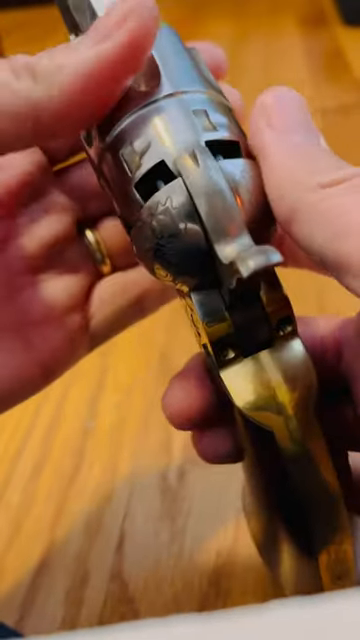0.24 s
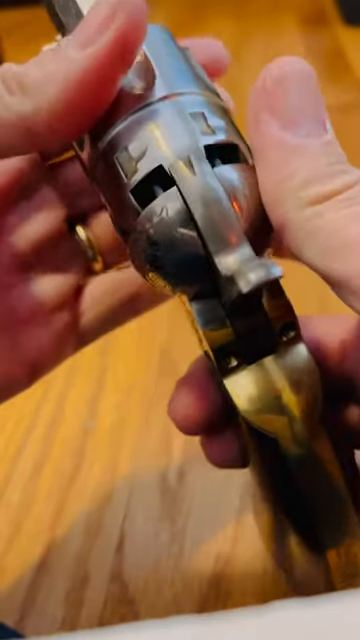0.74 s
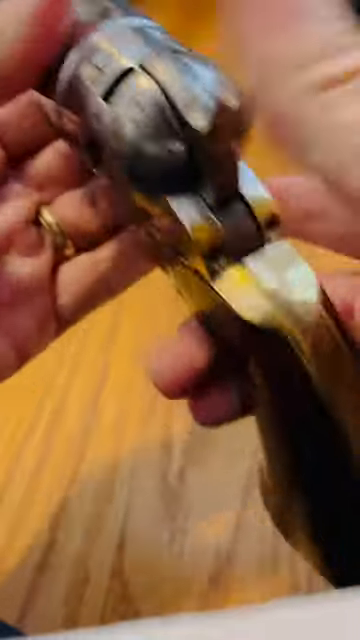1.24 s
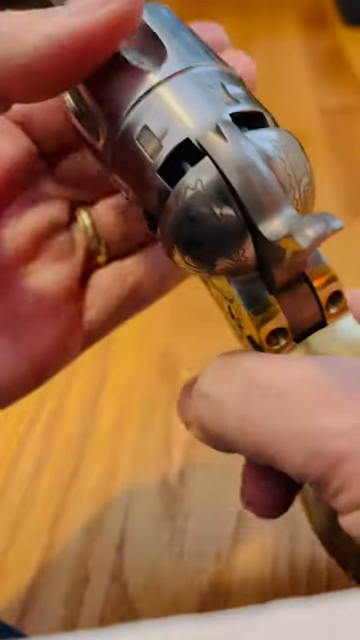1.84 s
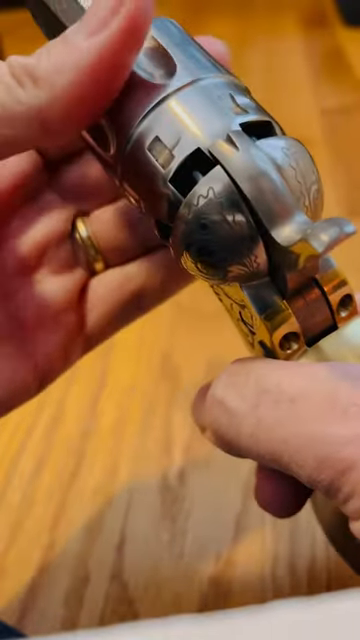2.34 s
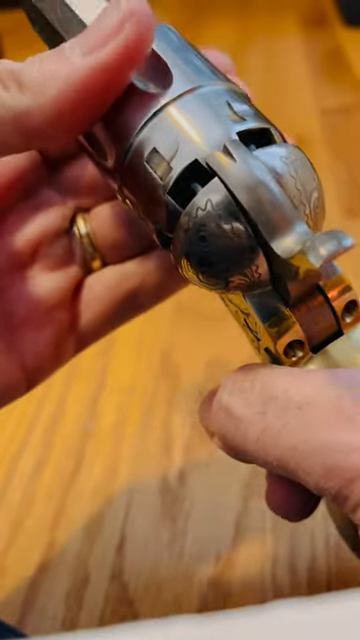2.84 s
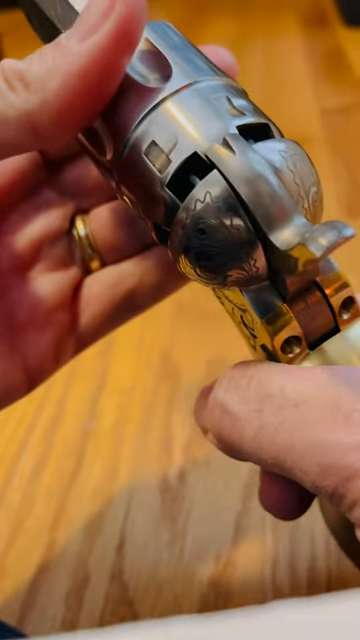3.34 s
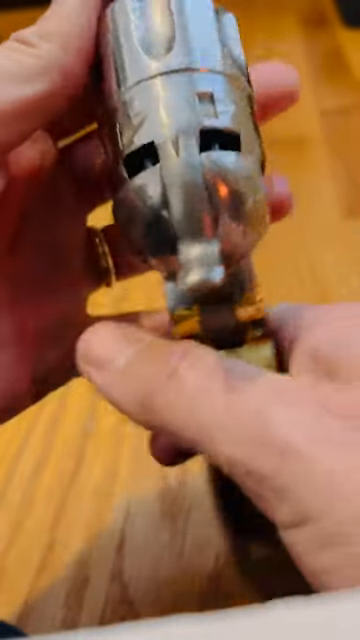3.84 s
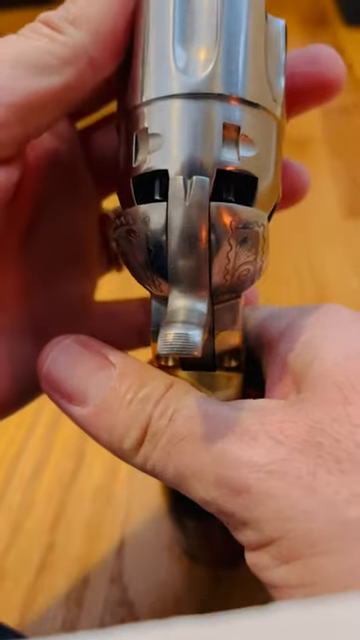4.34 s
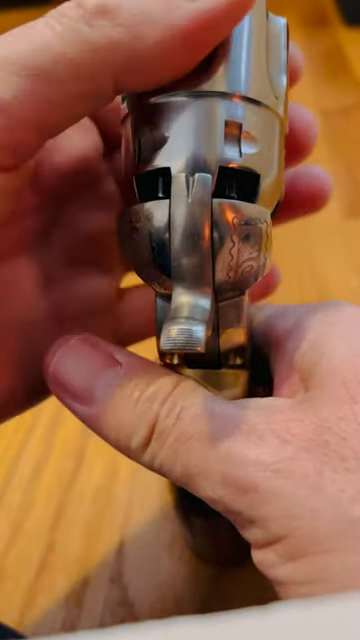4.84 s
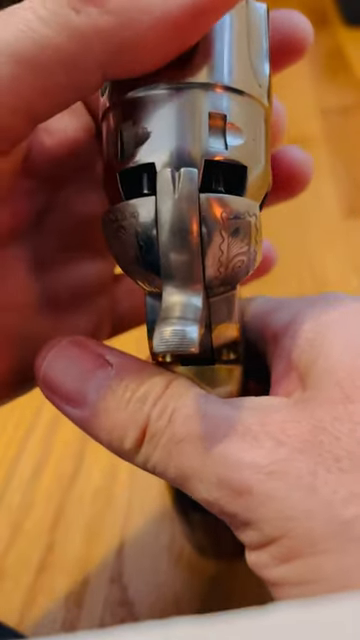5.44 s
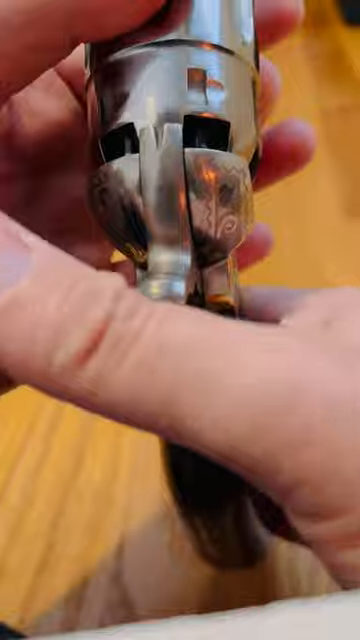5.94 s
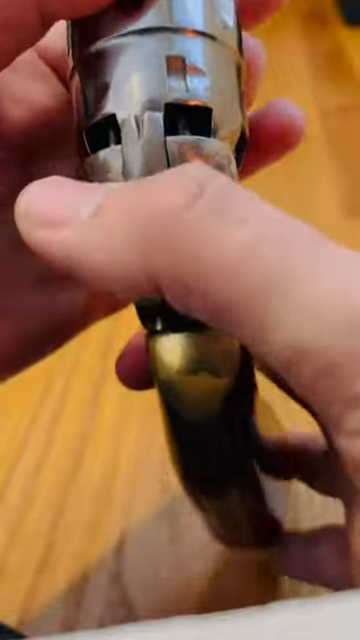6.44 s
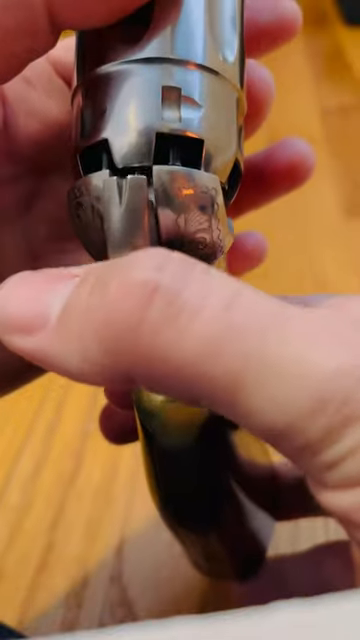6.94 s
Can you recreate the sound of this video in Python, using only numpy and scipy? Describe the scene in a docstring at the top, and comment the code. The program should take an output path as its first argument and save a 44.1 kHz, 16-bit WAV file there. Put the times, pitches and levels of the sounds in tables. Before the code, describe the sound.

Hands work a revolver close to the microphone in a quiet room, over a faint, low, throbbing hum. Two light metallic knocks come at about 0.5 and 0.7 seconds, followed by small ticks and soft, dull handling bumps until 1.5 seconds. From 1.8 to 2.2 seconds the mechanism gives a quick cluster of crisp clicks, with another light knock near 2.5. More clicks start around 3.4 seconds and end in the sharpest snap at 3.5, which leaves a brief, high steel ring. At about 3.9 seconds a heavy thud, the loudest sound, resonates through a wooden table and dies quickly. After that the handling is quieter, with scattered ticks and knocks near 4.5, 5.3 and 5.7 seconds, a soft bump at 6.5 and a last click at 6.9. Skin faintly rubs and slides on steel between the clicks.

```python
"""Revolver handled over a table

Hands turn a revolver's cylinder and work its hammer in a quiet room, close to a pair of microphones.
Loose parts knock and excite the frame's damped modes; the latch snaps and sets spring and cylinder ringing.
Skin hisses on steel by friction, the wooden table resonates under one heavy thud, and a low hum throbs."""
import sys
import numpy as np
from scipy import signal
from scipy.fft import rfft, irfft
from scipy.io import wavfile
from scipy.ndimage import uniform_filter1d

SR = 44100
rng = np.random.default_rng(int(sys.argv[2]) if len(sys.argv) > 2 else 0)


def unload_wav(signal):
    """Save mono or channel-first audio to the path in sys.argv[1] as 16-bit WAV at rate SR, clipped to [-1, 1]."""
    wavfile.write(
        sys.argv[1],
        SR,
        np.round(np.clip(np.atleast_2d(signal).T, -1, 1) * 32767).astype(np.int16),
    )


N = 317520
CRACK_SAMPLES, RING_SAMPLES = 1024, 3000


def amp(db):
    """Amplitude ratio of a level: tenfold for every 20 dB."""
    return 10 ** (np.asarray(db) / 20)


def unit_rms(x):
    """Normalisation to a mean power of 1."""
    return x / np.sqrt(np.mean(x ** 2) + 1e-20)


def at_hz(points, hz):
    """Interpolation of a curve along a logarithmic frequency axis."""
    f, value = np.transpose(points)
    return np.interp(np.log(hz + 1), np.log(f + 1), value)


def over_time(rows):
    """Linear interpolation of each column against time, one value a sample."""
    times, *columns = np.transpose(rows)
    return [np.interp(np.arange(N) / SR, times, c) for c in columns]


def add(mix, start, sound):
    """Superposition: a sound joins the mix at its start time in seconds."""
    part = mix[round(start * SR):][:len(sound)]
    part += sound[:len(part)]


def filtered(x, spectrum):
    """Zero-phase filtering: each frequency is weighted by the spectrum's level."""
    return irfft(rfft(x) * amp(at_hz(spectrum, np.fft.rfftfreq(len(x), 1 / SR))), len(x))


def noise(spectrum, size):
    """Coloured noise of rms 1, filtered from white noise."""
    return unit_rms(filtered(rng.standard_normal(size), spectrum))


def wander(size):
    """Slow random fluctuation of rms 1: a moving average of noise over size samples."""
    return unit_rms(uniform_filter1d(rng.standard_normal(N), size))


def wavering(hz, db, spread):
    """Frequency modulation: a tone's pitch wanders slowly about its curve."""
    pitch = hz * (1 + spread * wander(size=2500))
    return np.sqrt(2) * amp(db) * np.sin(2 * np.pi * np.cumsum(pitch) / SR)


def ring(hz, t60, rise, size=RING_SAMPLES):
    """A damped mode builds up, then decays by 60 dB every t60 seconds."""
    t = np.arange(size) / SR
    return amp(-60 * t / t60) * (1 - np.exp(-t / rise)) ** 2 * np.sin(2 * np.pi * hz * t)


def burst(spectrum, t60, rise):
    """A brief impact is broadband: noise with a fast attack and an exponential decay."""
    t = np.arange(CRACK_SAMPLES) / SR
    return noise(spectrum, CRACK_SAMPLES) * amp(-60 * t / t60) * (1 - np.exp(-t / rise))


def dying(decays, size):
    """Frequency-dependent damping: noise of energy 1 whose bands decay at their own rates."""
    hz, t, bands = signal.stft(rng.standard_normal(size), SR, nperseg=256)
    envelopes = amp(-60 * t / at_hz(decays, hz)[:, None])
    tail = signal.istft(bands * envelopes, SR, nperseg=256)[1]
    return tail / np.linalg.norm(tail)


def hum():
    """Amplitude modulation: a low tone throbs about once a second under two faint, wavering ones."""
    # throb of the low tone: (time [s], level [dB])
    throb = [(0, -59.5), (.3, -59), (.42, -79), (.6, -82), (.72, -65), (1.3, -58.5), (1.72, -71.5),
             (1.9, -62), (2.28, -56.5), (2.5, -76), (2.98, -56), (3.2, -70), (3.68, -58), (4.15, -58),
             (4.42, -72.5), (4.62, -61), (5.25, -60), (5.43, -74.5), (5.56, -61.5), (6.15, -58.5),
             (6.28, -69.5), (6.46, -61.5), (7.2, -64)]
    # the two tones above it: (time [s], frequency [Hz], level [dB])
    drone = [(0, 120, -86.5), (2.2, 127, -79.5), (2.9, 119.5, -79), (3.8, 126.7, -74), (5.3, 138.8, -72.5),
             (5.5, 135.8, -88.5), (6.75, 129.1, -88), (6.95, 124.6, -70.5), (7.2, 115, -68)]
    whir = [(0, 278, -72), (.35, 272, -85), (1.8, 266, -80), (2.1, 260, -74), (2.4, 264, -90.5),
            (3.7, 270, -77.5), (4.5, 268, -89), (4.75, 267, -74.5), (5.85, 281, -74.5), (6.05, 281, -85.5),
            (6.7, 264, -86.5), (6.83, 262, -77), (7.2, 272, -78.5)]
    hum_hz, flutter_db = 59.4, 3.5
    hum_db = over_time(throb)[0] + flutter_db * wander(size=3000)
    low = wavering(hum_hz, hum_db, spread=0.006)
    return low + wavering(*over_time(drone), spread=0.028) + wavering(*over_time(whir), spread=0.01)


def room_air():
    """Ambient noise: a steady floor with most of its power at low frequencies."""
    # spectrum of the quiet room: (frequency [Hz], relative density [dB])
    air = [(15, -54), (32, -26.5), (60, -7), (120, -8.5), (196, -19), (278, -13.5), (400, -31),
           (700, -28.5), (1200, -36.5), (2500, -38.5), (4800, -42), (9000, -51), (13000, -52.5),
           (14000, -62), (16000, -64.5)]
    return amp(-70) * noise(air, N)


def grip_rustle():
    """Friction of a shifting grip makes low noise of uneven level."""
    # strength of the rustle: (time [s], level [dB])
    rustle = [(0, -74), (.3, -83), (.9, -91), (1.2, -81.5), (2.2, -79.5), (2.6, -86.5), (3.2, -88.5),
              (3.55, -71), (3.9, -78), (4.3, -91), (5, -99), (5.8, -88), (6.1, -75), (6.5, -74.5),
              (6.7, -88), (7, -84), (7.2, -73.5)]
    grip = noise([(120, -32), (300, 0), (600, -4), (1000, -14.5), (2000, -38)], N)
    return amp(over_time(rustle)[0] + 0.72 * wander(size=900)) * grip


def knocks():
    """Impact excitation: loose parts ring the hand-damped frame, detuned by the grip, under a dry tick."""
    # blows: (time [s], level [dB], low-mode gain [dB], upper-mode gain [dB], sharpness [dB])
    blows = [(0.5344, -42, -21.5, -9.5, -24), (0.6853, -44.5, -16.5, -30, -5.5), (1.049, -55, -4, -4, 2.5),
             (1.291, -66, -6, 8.5, 8), (1.3799, -62, -12.5, -3, 2), (1.5728, -67, -5.5, -14, 0),
             (1.6475, -58.5, -13.5, -13, -6), (1.8341, -37, -25.5, -15, -15.5),
             (2.0321, -55, -22, -12, -11), (2.2179, -45.5, -22, -18, -9.5),
             (2.4566, -44.5, -17.5, -19, -22.5), (2.5722, -58.5, -12, -17, -7.5),
             (2.8971, -69, 1.5, -5, -5), (3.1674, -70.5, -1.5, -25, -19), (3.1976, -72.5, -4, -18, -21),
             (3.2352, -63.5, -30, -9, -13.5), (3.374, -59, -3.5, 1.5, 11.5),
             (3.5487, -43, -41.5, 0.5, -0.5), (3.7127, -60, -15, -1.5, -8),
             (4.4637, -56.5, -32.5, -9.5, -34.5), (4.4852, -60, -30, -10, -28), (4.6095, -73, -6, -7, 3.5),
             (5.3023, -47.5, -14.5, -10, -17), (5.6296, -65.5, -11, -13.5, -18),
             (5.6616, -54, -41, -8, -12), (5.925, -60, -6.5, 5, -2.5), (6.4676, -62, -6.5, -33.5, -17),
             (6.6189, -70.5, -7.5, -11, -7.5), (6.9381, -46, -9.5, -11.5, -24)]
    # modes of the held frame: (frequency [Hz], level [dB], t60 [s])
    frame_modes = [(921.7, 10.5, 0.045), (1550, 9.5, 0.015), (1974, 5, 0.014), (2844, 12.5, 0.013),
                   (4048, 9, 0.0088), (5127, 9, .008), (7600, -11, 0.0053)]
    # gain that each mode takes: (index: 0 none, 1 low-mode, 2 upper-mode, 3 sharpness)
    gain_of_mode = [1, 1, 0, 2, 3, 3, 3]
    out = np.zeros(N)
    detunings = 1 + 0.06 * rng.standard_normal((len(blows), len(frame_modes)))
    for (start, db, low_db, upper_db, sharp_db), ratios in zip(blows, detunings):
        gains = amp(db + np.array([0, low_db, upper_db, sharp_db]))[gain_of_mode]
        for (hz, mode_db, t60), gain, ratio in zip(frame_modes, gains, ratios):
            add(out, start - 0.0007, gain * amp(mode_db) * ring(hz * ratio, t60, rise=0.00033))
        # a sharper blow has more treble
        tick = [(400, -16), (1000, -2), (1700, 3.5), (3000, -7), (6000, sharp_db), (14000, sharp_db - 19.5)]
        add(out, start - 0.0005, amp(db - 16) * burst(tick, t60=0.072, rise=0.000791))
    return out


def sliding_skin():
    """Sliding friction hisses in uneven grains; the hollow between hand and steel resonates."""
    # spectrum of skin on steel: (frequency [Hz], level [dB])
    friction = [(500, -21), (1200, -0.5), (2500, -2.5), (5000, -1), (8000, -9), (12000, -10), (14000, -9),
                (16000, -18)]
    # strokes: (time [s], duration [s], level [dB], gain below 3 kHz [dB], gain above 7 kHz [dB],
    # hollow's frequency [Hz], hollow's gain [dB])
    strokes = [(0.683, 0.049, -79, -5, -17, 4800, 7), (0.817, 0.24, -84.5, 7.5, 4, 5200, -6),
               (1.034, 0.14, -83, 6.5, -9, 2000, -17), (1.099, 0.24, -69, -2.5, 1.5, 1170, 4),
               (1.29, 0.41, -79.5, 6, 11.5, 5140, 2), (1.622, .14, -77, 8.5, -13, 1900, -5),
               (1.843, 0.094, -74.5, -7, 0, 6900, 8), (2.126, 0.14, -71, -3.5, -6, 2820, -1),
               (3.435, 0.091, -68.5, 0, -12, 1970, -2), (3.506, 0.1, -70.5, 4, 3.5, 6600, 3),
               (3.56, 0.28, -74.5, 1, 4.5, 4962, -17), (3.7, 0.44, -82.5, -4.5, 6.5, 2000, -4),
               (4.62, 0.15, -70, 2, 1, 1628, -1.5), (4.99, 0.096, -91, 3, -4.5, 2000, 6.5),
               (5.049, 0.14, -71, -8.5, 1.5, 1800, 2), (5.704, 0.061, -83, -5, 6, 6360, -1),
               (5.975, 0.11, -85.5, 3, 2, 11990, -4), (6.197, 0.28, -80.5, 3.5, -6, 12000, -16),
               (6.628, 0.085, -84.5, -6, -5, 2746, 20), (6.635, 0.075, -87.5, -2, -3, 4520, 18.5),
               (6.665, 0.039, -89, 0, 11, 1485, 22)]
    hiss = noise(friction, N) * amp(2.2 * wander(size=300))
    low = signal.sosfiltfilt(signal.butter(2, 3000, fs=SR, output="sos"), hiss)
    high = signal.sosfiltfilt(signal.butter(2, 7000, "high", fs=SR, output="sos"), hiss)
    out = np.zeros(N)
    for start, duration, db, low_db, high_db, hollow_hz, hollow_db in strokes:
        span = slice(round(start * SR), round((start + duration) * SR))
        progress = np.linspace(0, 1, span.stop - span.start)
        pressure = np.sin(np.pi * progress ** 0.75) ** 1.2  # bears down quickly, eases off slowly
        tilted = hiss[span] + (amp(low_db) - 1) * low[span] + (amp(high_db) - 1) * high[span]
        hollow = signal.lfilter(*signal.iirpeak(hollow_hz, Q=4.5, fs=SR), hiss[span])
        add(out, start, amp(db) * pressure * (tilted + amp(hollow_db) * hollow))
    return out


def latch_snaps():
    """Free vibration: the latch cracks home, its spring rings briefly and the cylinder rings on."""
    # snaps: (time [s], level [dB], spring frequency [Hz], spring t60 [s], crack gain [dB],
    # cylinder gain [dB], rise [ms])
    snaps = [(0.6845, -74.5, 7100, .01, 25.5, -29, 0.46), (1.1916, -70, 7240, .01, 10, -23, 0.45),
             (1.3789, -53.5, 6200, .01, -5, -26, 0.35), (1.647, -52.5, 6700, 0.0094, -3, -41, 0.35),
             (1.8506, -39.5, 6960, .01, 3.5, -23, 0.2), (2.0226, -34, 6650, 0.01, -6.5, -28.5, 0.5),
             (2.1335, -41.5, 6840, 0.021, -11, -50, 4.2), (2.1587, -36, 6385, 0.016, -5, -47.5, 0.43),
             (2.178, -66, 6600, .01, 7, -16, 0.46), (3.3727, -38.5, 6670, 0.017, -8, -49, 0.29),
             (3.4676, -39.5, 7000, 0.014, -3, -39, 0.64), (3.536, -55, 6830, 0.044, -5, -36, 3.4),
             (3.5493, -21.5, 6370, 0.019, 2.5, -17.5, 0.18), (3.5572, -42, 6912, 0.011, 2.5, -27.5, .4),
             (3.7118, -58, 6300, .01, 10.5, -22.5, 0.32), (5.7088, -60.5, 6440, 0.0091, 11.5, -36, 0.55),
             (6.937, -62, 6866, 0.0098, 8.5, -14, 0.44)]
    # spectrum of the crack: (frequency [Hz], level [dB])
    crack = [(1500, -20), (2100, -11), (3500, -10.5), (5000, -4.5), (6000, -1.5), (8300, -9.5),
             (10500, -16.5), (13000, -15.5), (16000, -28)]
    # modes of the cylinder: (frequency [Hz], level [dB], t60 [s])
    cylinder_modes = [(680.2, -10.5, 0.1), (6540, -10, .11), (6433, -13, .14), (6735, -12.5, .12),
                      (9290, -7, 0.092), (9390, -3.5, 0.1098), (9420, -7, .09), (12950, 6, .016),
                      (13090, 11, 0.015), (13180, -6.5, .11), (13270, -11, .1)]
    cylinder = sum(amp(db) * ring(hz, t60, rise=0.001, size=4 * RING_SAMPLES)
                   for hz, db, t60 in cylinder_modes)
    out = np.zeros(N)
    for start, db, hz, t60, crack_db, cylinder_db, rise_ms in snaps:
        rise = abs(rise_ms) / 1000
        overtone = amp(-18.5) * ring(1.22 * hz, 0.2 * t60, rise)
        add(out, start, amp(db + crack_db) * burst(crack, t60=0.0067, rise=rise))
        add(out, start, amp(db + 5) * (ring(hz, t60, rise) + overtone))
        add(out, start, amp(db + cylinder_db) * cylinder)
    return out


def hand_bumps():
    """Heavy damping: each soft bump of the hands dies within about five cycles."""
    # bumps: (time [s], level [dB], frequency [Hz])
    bumps = [(0.685, -38.5, 69.5), (1.098, -49, 388), (1.203, -36.5, 89.5), (1.395, -33.5, 73),
             (1.422, -34.5, 86), (6.466, -41.5, 150)]
    out = np.zeros(N)
    for start, db, hz in bumps:
        add(out, start, amp(db) * ring(hz, t60=5.2 / hz, rise=0.39 / hz, size=2 * RING_SAMPLES))
    return out


def table_thud():
    """Modal response: a slap rattles the boards and rings the table, its lower modes arriving later."""
    # modes of the table: (frequency [Hz], level [dB], t60 [s])
    table_modes = [(91.7, -9, 0.3), (127.27, -6, 0.36), (147.5, -13.5, 0.37), (169, -7, 0.36),
                   (221, -17.5, 0.36), (270, -1, 0.18), (305.2, -2, 0.16), (353, -7, .19),
                   (381.4, -2.5, 0.24), (429.3, -13, 0.27), (460.5, -14.5, 0.19), (497, -12.5, 0.16),
                   (580, -27, 0.28), (662.4, -30.5, 0.26), (784.5, -18, 0.14), (843.4, -9, 0.071),
                   (888, -15.5, 0.046), (1082.9, -27, 0.0395)]
    # spectrum of the slap on wood: (frequency [Hz], level [dB])
    slap = [(300, -12), (620, -9), (820, -1.5), (1200, -21), (2100, -17), (3200, -28), (5000, -40.5),
            (6500, -51), (16000, -55.5)]
    # decay of the rattling boards: (frequency [Hz], t60 [s])
    board_decays = [(300, 0.2309), (800, 0.31), (1500, 0.32), (3000, 0.12), (5000, 0.17), (12000, .1)]
    start = 3.9185
    out = np.zeros(N)
    for hz, db, t60 in table_modes:
        add(out, start + 0.65 / hz, amp(db - 10) * ring(hz, t60, rise=0.23 / hz, size=SR))
    add(out, start + 0.0033, amp(-8) * ring(330, t60=0.066, rise=0.0025))  # the hand's weight lands
    add(out, start, amp(-16) * burst(slap, t60=0.013, rise=0.00072))
    padded = np.r_[np.zeros(CRACK_SAMPLES), dying(board_decays, SR // 2)]
    rattle = filtered(padded, slap)[CRACK_SAMPLES:]
    build_up = 1 - np.exp(-np.arange(len(rattle)) / SR / 0.021)
    add(out, start + 0.0016, amp(13) * rattle * build_up)
    return out


def diffuse_field(echoing):
    """Reverberation, hand noise and room air at one spot; their noise differs from spot to spot."""
    # reverberation time of the room: (frequency [Hz], t60 [s])
    room_decays = [(300, 0.35), (1500, 0.26), (3000, .15), (6000, 0.31), (9000, 0.28), (15000, 0.15)]
    response = np.r_[np.zeros(300), dying(room_decays, SR // 2)]  # begins 7 ms late
    tail = signal.fftconvolve(echoing, response)[:N]
    return tail + sliding_skin() + grip_rustle() + hand_bumps() + room_air()


def microphone_pair(left, other, phase_scale):
    """Partial coherence: the right microphone hears a phase-shifted blend of the left sound and another."""
    # the pair: (frequency [Hz], right's lead at phase_scale 1 [rad], coherence [0-1], left over right [dB])
    pair = [(99.3, 0.5, 1, 0.13), (199, 0.5, 0.93, -0.13), (337, 1.04, 1, 0.4), (760, 3, 0.52, -0.5),
            (1000, 3.5, 0.37, 1.5), (1250, 1.43, 1, 2.5), (2000, 1.14, 1, -2), (2546, -2.5, 0.82, -1.5),
            (3480, -2, 1, 0), (4540, -1.46, 1, -1.5), (5120, -2, 0.84, -1.5), (7370, -5.5, 0.86, -0.5),
            (16840, -19.5, 0.99, 0.5)]
    hz, *columns = np.transpose(pair)
    lead, coherence, balance_db = (np.interp(np.fft.rfftfreq(N, 1 / SR), hz, c) for c in columns)
    blend = coherence * rfft(left) + np.sqrt(1 - coherence ** 2) * rfft(other)
    right = np.exp(1j * phase_scale * lead) * blend
    return irfft(np.array([amp(balance_db / 2) * rfft(left), amp(-balance_db / 2) * right]), N)


def scene():
    """Direct sound, the nearest reflection and the diffuse field superpose at the microphones."""
    frame, latch, table, tones = knocks(), latch_snaps(), table_thud(), hum()
    steel = frame + latch
    echoing = amp(-15.5) * frame + amp(-14.5) * (latch + table)  # cupped hands shield the frame
    steel_bounce, table_bounce = np.roll([steel, table], 97, axis=1)  # reflection, 2 ms late
    # the table reaches both microphones almost together
    below = microphone_pair(table, table_bounce, phase_scale=0.38)
    left = steel + tones + diffuse_field(echoing)
    other = steel_bounce + tones + diffuse_field(echoing)
    return below + microphone_pair(left, other, phase_scale=0.97)


def record(dry):
    """Band limiting: a linear-phase low-pass filter removes the highest treble."""
    low_pass = signal.firwin(511, cutoff=16200, window=("kaiser", 9), fs=SR)
    return signal.oaconvolve(dry, low_pass[None], "same")


dry = scene()
out = record(dry)
unload_wav(out)
```